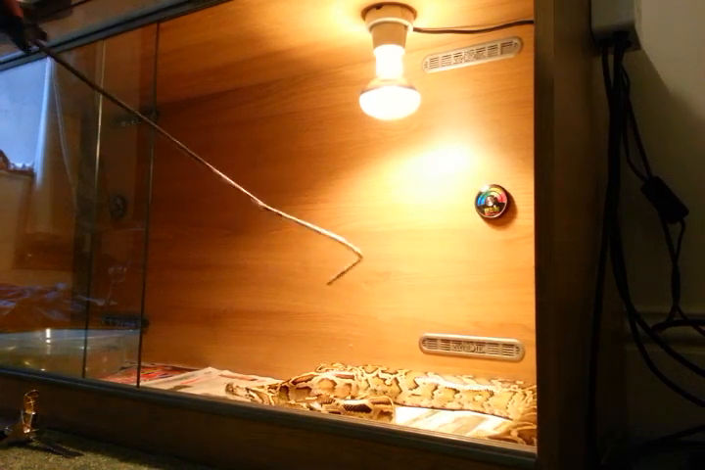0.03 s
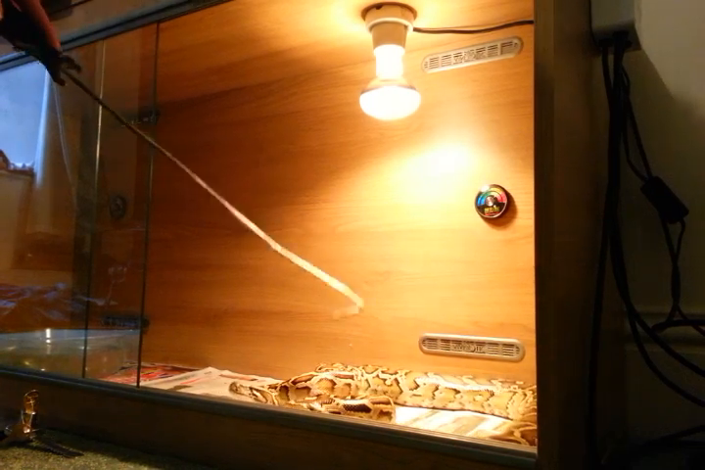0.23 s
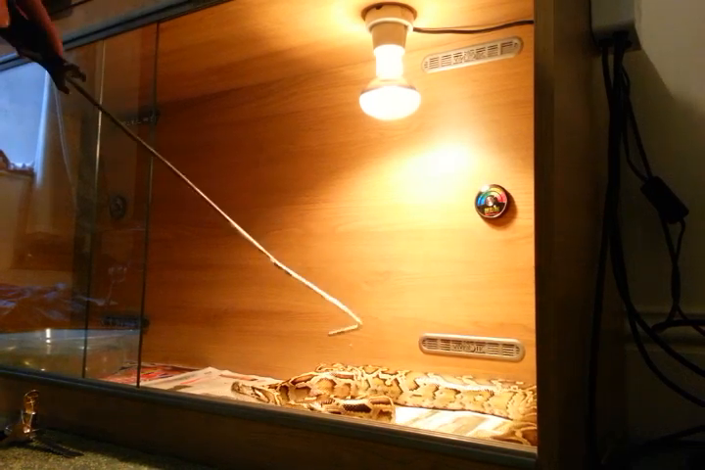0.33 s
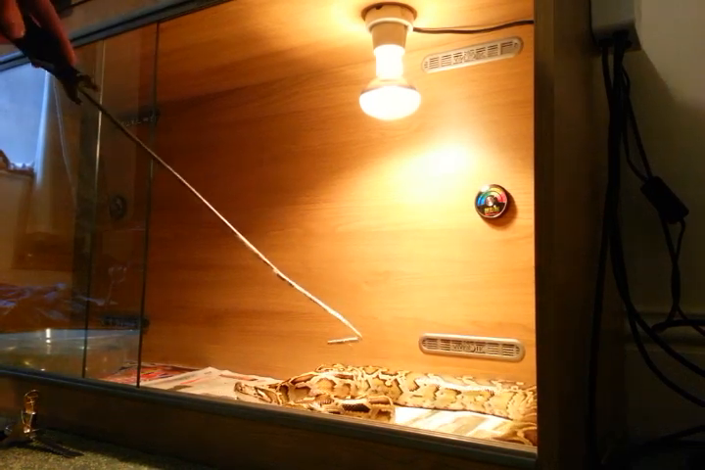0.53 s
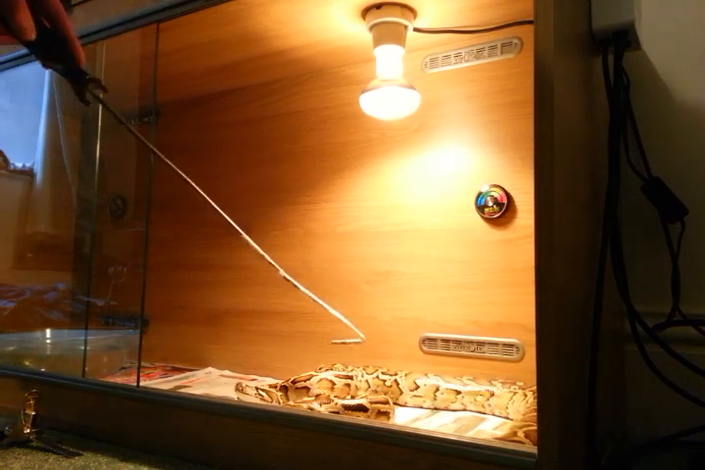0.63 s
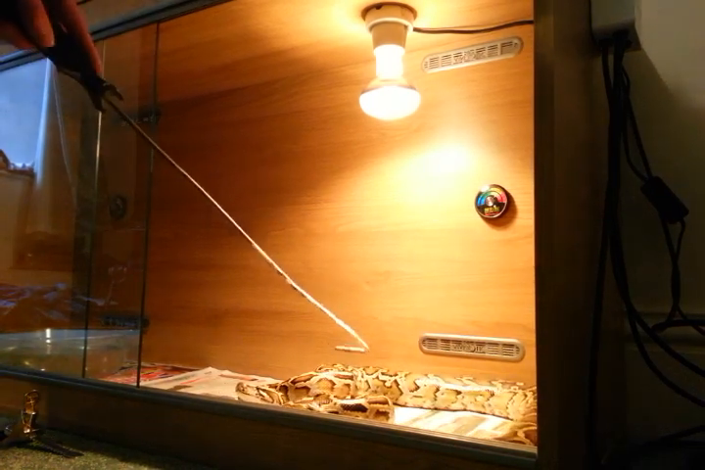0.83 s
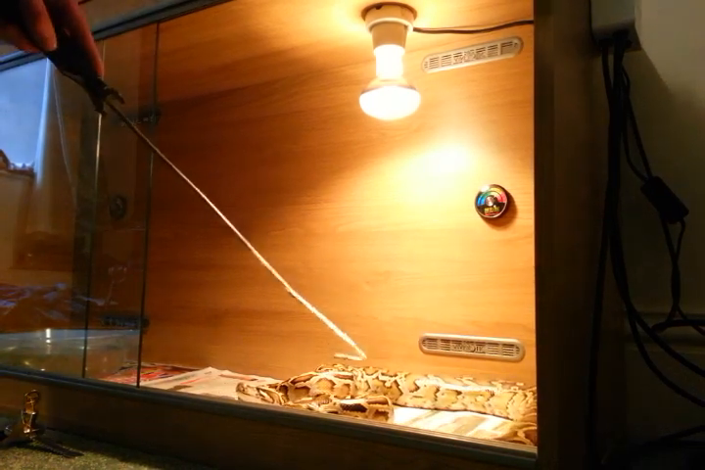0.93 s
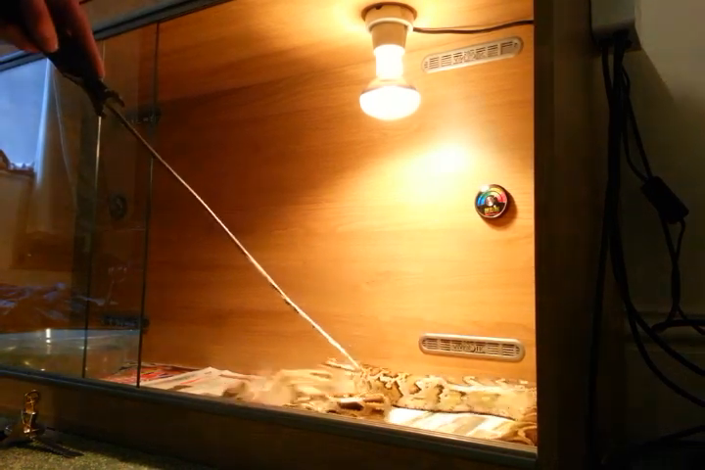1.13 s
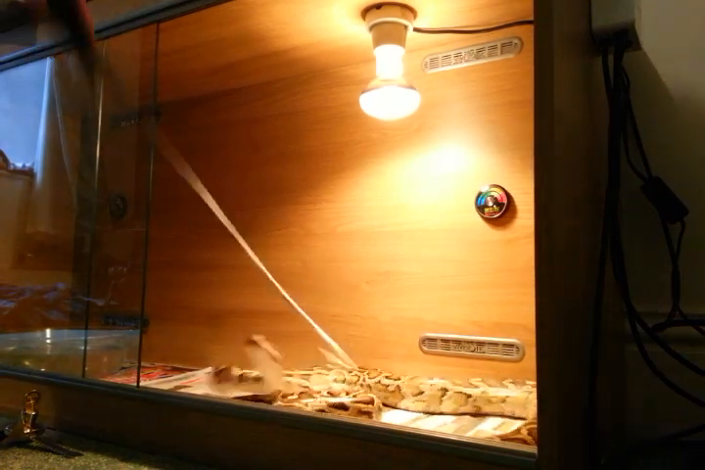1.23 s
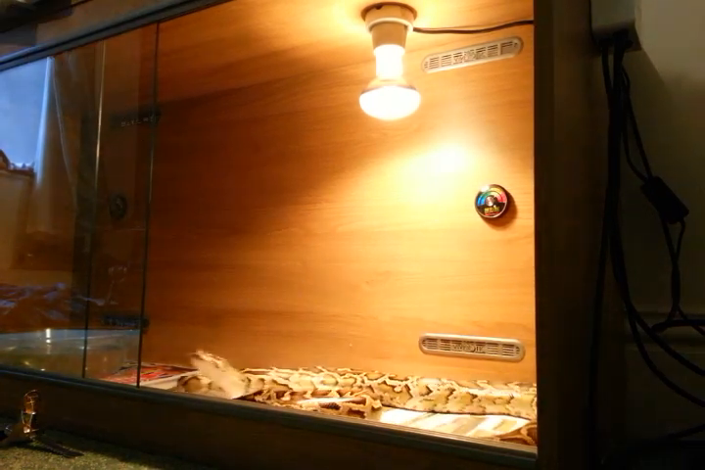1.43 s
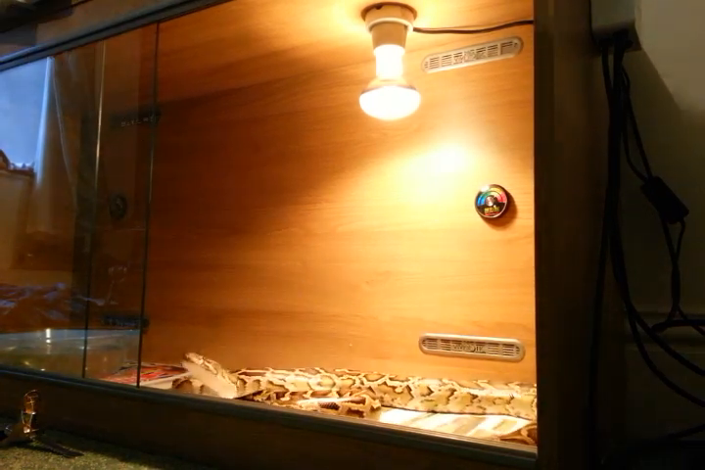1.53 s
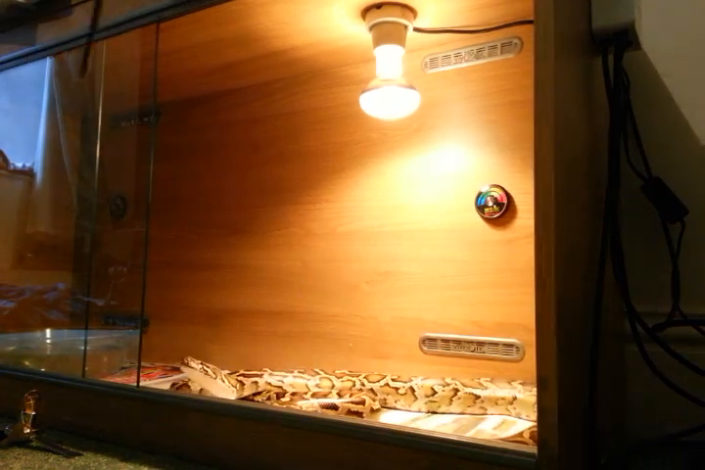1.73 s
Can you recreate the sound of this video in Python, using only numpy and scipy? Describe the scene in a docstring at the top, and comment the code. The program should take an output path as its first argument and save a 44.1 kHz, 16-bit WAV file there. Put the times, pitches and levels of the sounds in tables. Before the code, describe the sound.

A snake hisses close by as a stick knocks once, then it lunges with a thump.

```python
"""A long, breathy hiss comes from a snake in a wooden, glass-fronted tank, close to the microphone.
A stick knocks once on the tank and makes it ring. The snake lunges with a forced hiss, slides over its
bedding, thumps the cabinet and lands with a dull plop. It stops for an instant, then draws air in with a
thinner hiss. Each hiss is air rushing through its windpipe opening. A heat lamp buzzes faintly."""
import sys
import numpy as np
from scipy import signal
from scipy.fft import rfft, irfft
from scipy.io import wavfile
from scipy.ndimage import uniform_filter1d

SR = 44100
rng = np.random.default_rng(int(sys.argv[2]) if len(sys.argv) > 2 else 0)


def dump_mix(stems):
    """Bounce the given channels to the path in sys.argv[1] as a 16-bit WAV at rate SR."""
    frames = np.atleast_2d(stems).T  # one column per channel
    limited = np.clip(frames, -1, 1)  # hard clip at full scale
    pcm = np.round(limited * 32767).astype(np.int16)
    wavfile.write(sys.argv[1], SR, pcm)


N = 79380
TIME = np.arange(N) / SR
# Noise is built in short overlapping frames, HOP samples apart, at the frequencies HZ.
HOP = 256
FRAMES, HZ = N // HOP + 5, np.fft.rfftfreq(1024, 1 / SR)
FINE_HZ = np.fft.rfftfreq(N, 1 / SR)

# Ringing tones of stick and tank. Each row: pitch in Hz, relative level in dB, seconds to fade by 60 dB.
TANK_TONES = [(155.3, -13, 0.32), (283, -17, 0.38), (613, -8, 0.38), (916, -4, 0.093), (1065, -7, 0.19),
              (1260, -21.5, 0.29), (1810, -2, 0.14), (1905, -23, 0.095), (2645, -11.5, 0.33),
              (2820, -4, 0.16), (3378, 1, 0.093), (3563, -12.5, 0.34), (4184, -4, 0.22), (4640, -12, 0.18),
              (4550, -24, 0.067), (5032, 14, .06), (5385, -6, 0.082), (6130, 1.5, 0.21), (7316, 0.5, 0.16)]


def amp(db):
    """Turns decibels into a gain."""
    return 10 ** (np.asarray(db) / 20)


def unit(x):
    """Scales a sound to an average power of 1."""
    return x / np.sqrt(np.mean(x ** 2) + 1e-20)


def read(points, hz):
    """Looks up a table between its rows, on a logarithmic frequency scale."""
    f, value = np.transpose(points)
    return np.interp(np.log(hz + 1), np.log(f + 1), value)


def level(points):
    """Gain that follows a level curve, silent before its first row."""
    s, db = np.transpose(points)
    return amp(np.interp(TIME, s, db, left=-np.inf))


def pan(db):
    """Left and right gains, with the left louder by db and the total power unchanged."""
    gains = np.array([amp(db / 2), amp(-db / 2)]).reshape(2, -1)
    return gains / np.sqrt((gains ** 2).mean(0))


def add(mix, s, sound):
    """Mixes a sound in, starting at s seconds."""
    part = mix[:, round(s * SR):][:, :sound.shape[-1]]
    part += sound[..., :part.shape[1]]


def noise(db, side_db=0, lead=None):
    """Stereo noise with a level in dB for each frequency, partly alike on the left and right."""
    # How alike the two sides are. Each row: frequency in Hz, likeness from 0 to 1.
    likeness = [(100, 1), (500, 0.47), (1500, 0.73), (5000, 0.47), (8000, 0.26), (13000, 0.17)]
    # How far the left wave runs ahead of the right. Each row: frequency in Hz, lead in radians.
    usual_lead = [(100, 0.5), (900, 0.34), (1800, 1.5), (2500, 1), (3500, 1.5), (4300, 1.18), (5200, 1.04),
                  (6400, -0.24), (7400, 2), (9500, 1.5), (10500, 4.4), (13500, 5.5)]
    lag = np.exp(-1j * read(usual_lead if lead is None else lead, HZ))
    same = np.clip(read(likeness, HZ), 0, 1)
    a, b, c, d = rng.standard_normal((4, FRAMES, len(HZ)))
    left = a + 1j * b
    right = (same * left + np.sqrt(1 - same ** 2) * (c + 1j * d)) * lag
    spectra = np.array([left, right]) * amp(db) * pan(side_db)[:, None]
    return signal.istft(spectra.swapaxes(1, 2), nperseg=1024, noverlap=1024 - HOP)[1][:, :N]


def hiss(colour, peaks_share, side_db):
    """Swirling air from the windpipe opening, wavering and coloured by the tank's standing waves."""
    # Narrow bands that the tank lifts or cuts. Each row: centre in Hz, width in Hz, full lift in dB.
    resonances = [(3550, 95, 8), (4090, 65, 1.5), (4873, 210, 6.5), (5090, 160, 8), (5390, 360, 13),
                  (5500, 110, -12.5), (6210, 150, 8)]
    # Stereo balance before side_db is added. Each row: frequency in Hz, left minus right in dB.
    balance = [(150, 14), (450, 1), (740, -8.5), (1220, -2.5), (2000, 2), (3000, 9.5), (4900, 6.5),
               (5700, 10), (6500, -8), (9000, 0), (11000, 0), (14000, 2.5)]
    ripple_db, ripple_hz, flicker_db = 5.5, 70, 0.5
    patches_db = uniform_filter1d(rng.standard_normal((FRAMES, len(HZ))), size=10, axis=0)
    patches_db = unit(uniform_filter1d(patches_db, size=14, axis=1))
    flicker = unit(uniform_filter1d(rng.standard_normal((FRAMES, 1)), size=3, axis=0))
    peaks_db = sum(db / (1 + (2 * (HZ - hz) / width) ** 2) for hz, width, db in resonances)
    air_db = read(colour, HZ) + peaks_share * peaks_db + patches_db - flicker_db * flicker
    air = noise(air_db, read(balance, HZ) + side_db)
    # Standing waves: random peaks and dips across the frequencies, different on each side.
    bumps = rng.standard_normal((2, len(HZ)))
    ripple = np.array([np.interp(FINE_HZ / ripple_hz, np.arange(len(HZ)), side) for side in bumps])
    return unit(irfft(rfft(air) * amp(ripple_db * ripple), N))


def hiss_out():
    """The snake pushes air out in one long hiss."""
    # Loudness of the breath. Each row: time in seconds, level in dB.
    loudness = [(0, -39.5), (.2, -39.5), (.45, -38.5), (.6, -39.5), (.88, -40.5), (1.19, -40.5),
                (1.26, -36.5), (1.44, -35.5), (1.56, -39), (1.6, -46), (1.64, -62.5), (1.67, -71)]
    # Its tone colour. Each row: frequency in Hz, relative level in dB.
    colour = [(40, -23), (130, -18.5), (270, -14), (400, -17.5), (560, -22), (700, -4), (950, -23),
              (1060, -7.5), (1170, -14.5), (1600, -6.5), (2050, -13), (3000, -8), (5000, -4.5), (6600, -2),
              (8600, -12.5), (11500, -9.5), (12600, -5), (14500, -21.5)]
    return level(loudness) * hiss(colour, peaks_share=0.68, side_db=-1.7)


def lamp():
    """The dimmed heat lamp ticks at twice the mains rate; each tick is a short falling whine."""
    ticks_per_s, tick_s, centre_hz, fall_hz_per_s = 100, 0.002, 10260, 130000
    t = (TIME * ticks_per_s % 1 - 0.5) / ticks_per_s  # seconds from the middle of each tick
    whine = np.sin(2 * np.pi * (centre_hz - fall_hz_per_s * t / 2) * t)
    return amp(-61.5) * pan(db=-9.5) * unit(np.exp(-(t / tick_s) ** 2) * whine)


def room():
    """Faint, steady room noise."""
    # Tone colour of the room. Each row: frequency in Hz, relative level in dB.
    colour = [(25, -42), (60, -36), (130, -26), (320, -20), (700, -16), (1500, -23), (6000, -14),
              (14500, -20)]
    return amp(-70) * unit(noise(read(colour, HZ)))


def fading_tone(hz, db, fade_s, rise_s, phase=0):
    """One vibration of a struck object: it rises quickly and loses 60 dB every fade_s seconds."""
    wave = np.sin(2 * np.pi * hz * TIME + phase)
    return amp(db - 60 * TIME / fade_s) * wave * (1 - np.exp(-TIME / rise_s))


def tank_lift(db, width_hz=75):
    """The boost in dB that the tank gives to noise near its ringing tones."""
    return db * np.max([1 / (1 + (2 * (HZ - row[0]) / width_hz) ** 2) for row in TANK_TONES], axis=0)


def room_tail(colour, rise_s, side_db, tank_db=0):
    """Sound lingering in the room after a hit; the treble dies first."""
    # How long the room rings. Each row: frequency in Hz, seconds to fade by 60 dB.
    fade_times = [(60, 0.41), (250, 0.42), (600, 0.29), (1500, 0.2), (5000, 0.23), (12000, 0.18)]
    frame_s = np.arange(FRAMES)[:, None] * HOP / SR
    wash = noise(read(colour, HZ) + tank_lift(tank_db) - 60 * frame_s / read(fade_times, HZ), side_db)
    return wash / wash[:, :SR // 50].std() * (1 - np.exp(-TIME / rise_s))


def knock():
    """The stick chatters on the tank, heard as one knock: sharp cracks, ringing and the room's answer."""
    # Contacts of the stick. Each row: start in seconds, relative level in dB.
    contacts = [(0.2279, -2.5), (.229, 3.5), (0.2309, 0), (0.2355, -6)]
    # Tone colours of a crack and of the room's answer. Each row: frequency in Hz, relative level in dB.
    crack_colour = [(25, -42), (70, -33), (180, -9.5), (400, -12), (600, -7), (900, -7.5), (1450, -17),
                    (1850, -4), (2250, -9), (2800, -7), (3900, -11), (4500, 1), (5400, 2), (6500, -5.5),
                    (7400, -1.5), (9000, -14), (11500, -24), (15000, -33)]
    tail_colour = [(30, -18), (70, -7), (140, 0), (300, 0), (480, -6.5), (650, 0.5), (1150, -2.5),
                   (1450, -4), (1850, 1), (2300, 0), (2700, 1.5), (3200, -2.5), (5300, 0), (7300, -3),
                   (9500, -13.5), (14000, -47)]
    # Stereo balance of the knock. Each row: frequency in Hz, left minus right in dB.
    balance = [(200, 0), (600, -3), (1000, 0), (1900, 4), (2800, 6), (4100, 4), (4900, 8), (6000, 2),
               (7300, -5), (9000, -2), (13000, 4)]
    # How far the left wave runs ahead of the right. Each row: frequency in Hz, lead in radians.
    lead = [(100, 0), (600, 0), (1000, 0.9), (2000, 1.47), (3400, 1.1), (4500, 2), (5500, 3), (7300, 3.5),
            (12000, 3)]
    crack_db, ring_db, tail_db = -9, -21.5, -22.5
    crack_rise_s, crack_fade_s, tail_delay_s = 0.00076, 0.036, 0.021
    out = np.zeros((2, N))
    fade = amp(-60 * TIME / crack_fade_s) * (1 - np.exp(-TIME / crack_rise_s))
    for s, db in contacts:
        crack = unit(noise(read(crack_colour, HZ) + tank_lift(db=8.5), read(balance, HZ), lead))
        add(out, s, amp(crack_db + db) * fade * crack)
    hardest_s = max(contacts, key=lambda row: row[1])[0]
    for hz, db, fade_s in TANK_TONES:
        phases = rng.uniform(0, 2 * np.pi) - np.array([[0], [read(lead, hz)]])
        ring = fading_tone(hz, db, fade_s, rise_s=0.00056, phase=phases)
        add(out, hardest_s, amp(ring_db) * pan(read(balance, hz)) * ring)
    tail = room_tail(tail_colour, rise_s=0.00091, side_db=0, tank_db=5)
    add(out, hardest_s + tail_delay_s, amp(tail_db) * tail)
    return out


def snap():
    """A thin, bright snap of treble, like the microphone overloading at the knock's peak."""
    start_s, fade_s, lowest_hz = 0.2312, 0.0056, 10500
    out = np.zeros((2, N))
    treble_only = signal.butter(3, lowest_hz, "high", fs=SR, output="sos")
    fizz = unit(signal.sosfilt(treble_only, rng.standard_normal((2, N))))
    add(out, start_s, amp(-14.5 - 60 * TIME / fade_s) * fizz)
    return out


def lunge_hiss():
    """The snake forces out a louder burst of air as it lunges."""
    # Loudness of the burst. Each row: time in seconds, level in dB.
    loudness = [(1.19, -50), (1.22, -41.5), (1.265, -29), (1.31, -29.5), (1.35, -28), (1.39, -35),
                (1.44, -53), (1.52, -42.5), (1.58, -52), (1.63, -67)]
    # Its tone colour. Each row: frequency in Hz, relative level in dB.
    colour = [(200, -45), (600, -24), (1500, -18), (2400, -24), (2750, -16), (3300, -3), (3900, -10),
              (4700, -3), (6200, -0.5), (7500, -1.5), (9500, -6.5), (11300, -9.5), (12400, -1),
              (14500, -16.5)]
    return level(loudness) * hiss(colour, peaks_share=0.14, side_db=-2)


def slide():
    """The body rubs over the bedding and makes the cabinet floor shudder."""
    # Loudness of the rubbing and of the low shudder. Each row: time in seconds, level in dB.
    rub_loudness = [(1.2, -53), (1.22, -36), (1.25, -42.5), (1.275, -37), (1.31, -50.5), (1.345, -33.5),
                    (1.385, -31), (1.42, -38.5), (1.46, -49.5), (1.6, -55.5), (1.66, -66.5), (1.8, -69)]
    shudder_loudness = [(1.21, -70), (1.225, -34), (1.28, -40.5), (1.32, -44), (1.42, -58), (1.55, -59.5),
                        (1.65, -66), (1.8, -79)]
    # Their tone colours. Each row: frequency in Hz, relative level in dB.
    rub_colour = [(60, -17), (190, -11), (300, 2.5), (460, -10), (580, -6.5), (780, -14), (1050, -8),
                  (1400, -10), (2200, -15), (2700, -20.5), (4800, -11.5), (8000, -44)]
    shudder_colour = [(25, -28), (45, 5), (70, 0.5), (110, -3), (170, -12), (300, -32), (1000, -60)]
    rub = unit(noise(read(rub_colour, HZ), side_db=-0.5))
    shudder = unit(irfft(rfft(rng.standard_normal(N)) * amp(read(shudder_colour, FINE_HZ)), N))
    return level(rub_loudness) * rub + level(shudder_loudness) * shudder


def thumps():
    """The lunging body bumps the cabinet, which rings with low tones."""
    # Soft blows of the body. Each row: start in seconds, level in dB.
    blows = [(1.213, -47), (1.2185, -28.5), (1.2365, -36.5), (1.279, -48)]
    # The cabinet's tones. Each row: pitch in Hz, relative level in dB, seconds to fade by 60 dB.
    tones = [(56, -16, 0.28), (69.9, -1.5, 0.32), (115.6, -0.5, 0.27), (240, -7, 0.11), (330, -4, 0.045),
             (521, 0, 0.074), (619, -7.5, 0.13)]
    out = np.zeros((2, N))
    ring = sum(fading_tone(*row, rise_s=0.00096) for row in tones)
    for s, db in blows:
        add(out, s, amp(db) * ring)
    return out


def plop():
    """The snake lands with a soft, hollow sound that echoes off the walls."""
    # Tones of the landing. Each row: pitch in Hz, relative level in dB, seconds to fade by 60 dB.
    tones = [(226, -15, .03), (265, 4.5, 0.032), (266, -15, 0.2), (385, 7, 0.015), (496, -17, 0.021),
             (646, -16, 0.037)]
    # Echoes from the walls. Each row: delay in seconds, relative level in dB.
    echoes = [(0.0213, -14), (0.0332, -20), (.053, -24)]
    # Tone colour of the room's answer. Each row: frequency in Hz, relative level in dB.
    tail_colour = [(50, -21), (150, -8), (280, -7), (420, -7.5), (650, -16), (1400, -42), (5000, -67)]
    start_s, band_hz = 1.5141, [162, 730]
    out = np.zeros((2, N))
    ring = amp(-19.5) * sum(fading_tone(*row, rise_s=0.00088) for row in tones)
    ring = signal.sosfilt(signal.butter(2, band_hz, "band", fs=SR, output="sos"), ring)
    add(out, start_s, ring)
    for delay_s, db in echoes:
        add(out, start_s + delay_s, amp(db) * ring)
    add(out, start_s, amp(-43) * room_tail(tail_colour, rise_s=0.0033, side_db=6))
    return out


def hiss_in():
    """The snake draws air back in with a thinner hiss."""
    # Loudness of the breath. Each row: time in seconds, level in dB.
    loudness = [(1.66, -73), (1.68, -56.5), (1.705, -49), (1.75, -47), (1.8, -45)]
    # Its tone colour. Each row: frequency in Hz, relative level in dB.
    colour = [(100, -39), (300, -20), (2700, -24), (4000, -21), (5200, -13.5), (6300, -15), (6850, -3.5),
              (7400, -11), (8200, -18), (9800, -18), (12300, -19), (14500, -26)]
    return level(loudness) * hiss(colour, peaks_share=0.15, side_db=-3)


def scene():
    """All the sounds together at the microphone."""
    return (hiss_out() + lamp() + room() + knock() + snap()
            + lunge_hiss() + slide() + thumps() + plop() + hiss_in())


def record(dry):
    """Cuts the deepest bass, turns quiet moments down, clips at full scale and cuts the top treble."""
    low_hz, high_hz = 40, 14650
    quiet_db, cut_db_per_db, deepest_db = -50, 0.63, -9
    x = signal.sosfilt(signal.butter(3, low_hz, "high", fs=SR, output="sos"), dry)
    power = abs(uniform_filter1d((x ** 2).mean(0), size=882))  # averaged over 20 ms
    power_db = 10 * np.log10(power + 1e-12)
    gain_db = np.clip(cut_db_per_db * (power_db - quiet_db), deepest_db, 0)
    clipped = np.clip(x * amp(gain_db), -1, 1)
    treble_cut = signal.firwin(511, high_hz, window=("kaiser", 9), fs=SR)
    return signal.oaconvolve(clipped, treble_cut[None], "same")


dry = scene()
out = record(dry)
dump_mix(out)
```